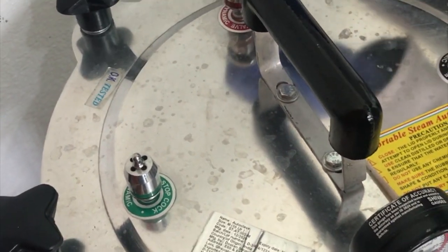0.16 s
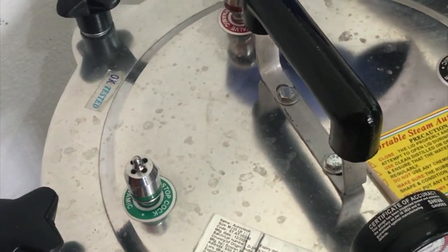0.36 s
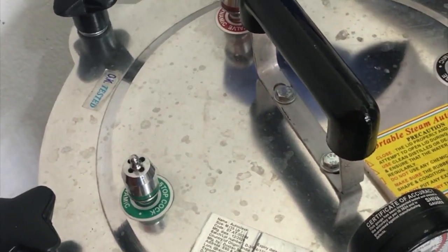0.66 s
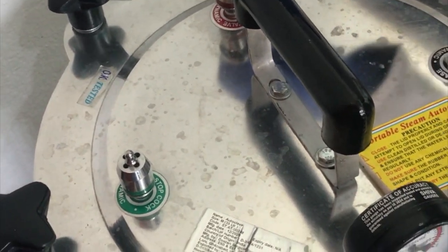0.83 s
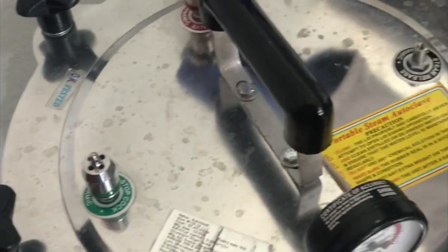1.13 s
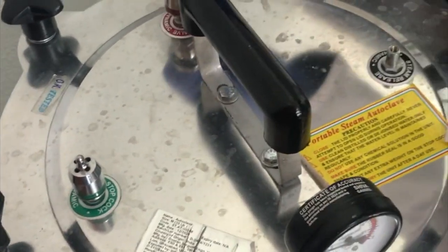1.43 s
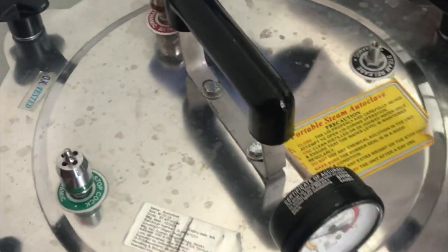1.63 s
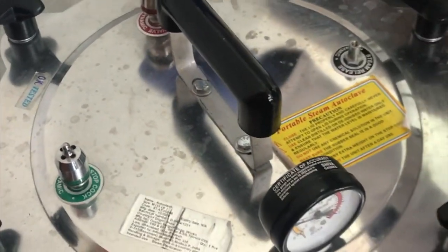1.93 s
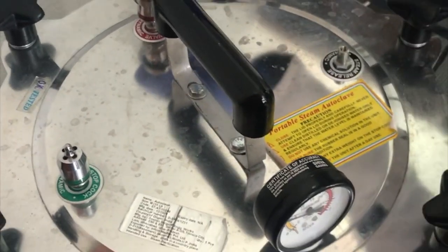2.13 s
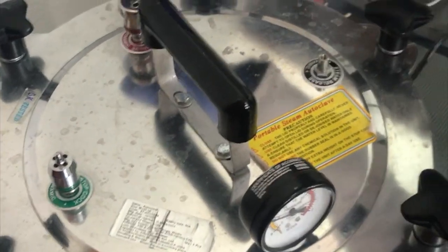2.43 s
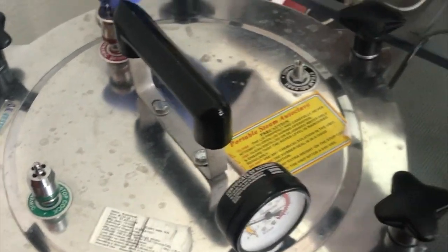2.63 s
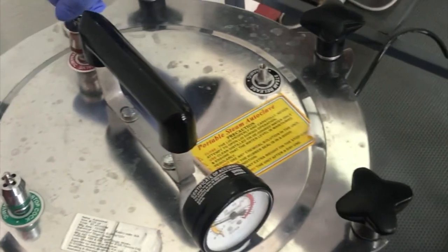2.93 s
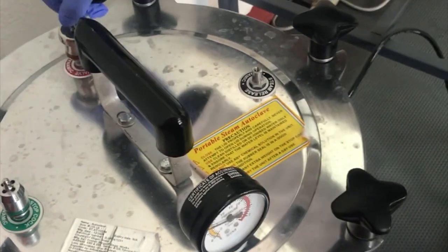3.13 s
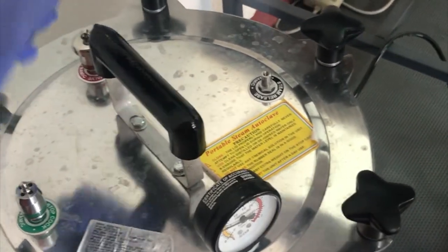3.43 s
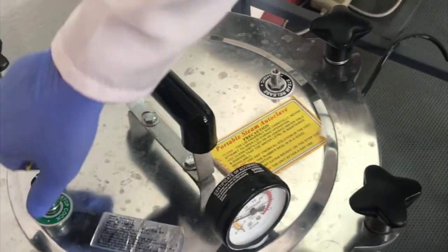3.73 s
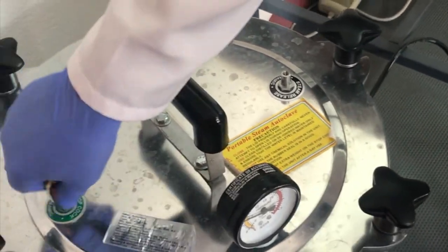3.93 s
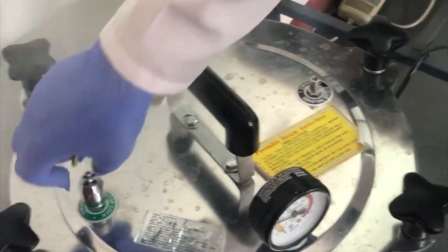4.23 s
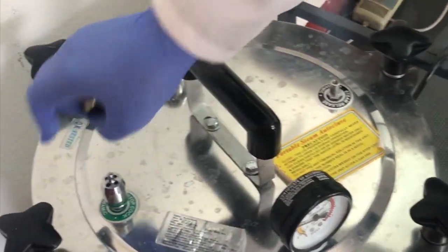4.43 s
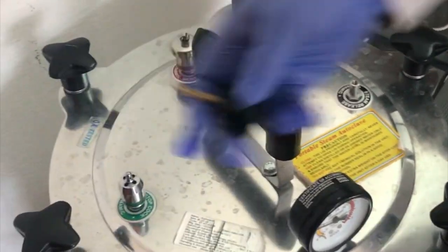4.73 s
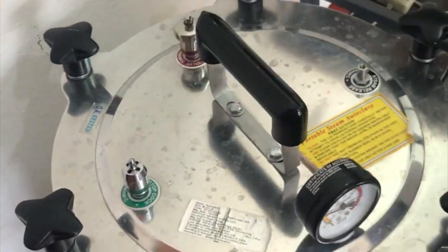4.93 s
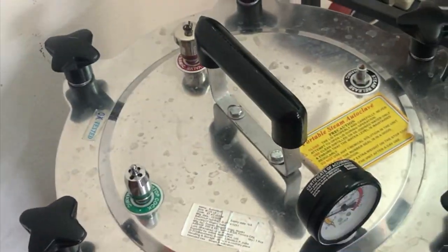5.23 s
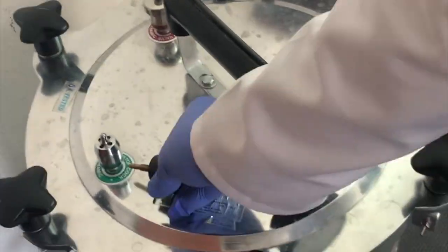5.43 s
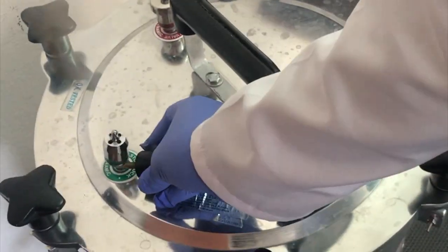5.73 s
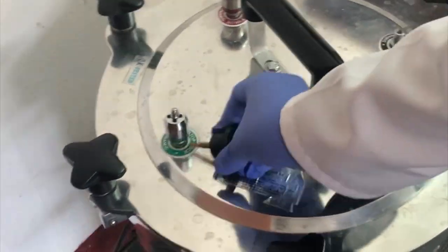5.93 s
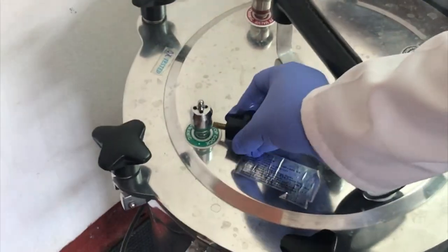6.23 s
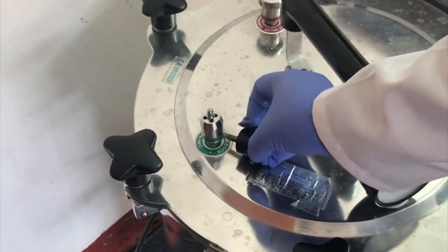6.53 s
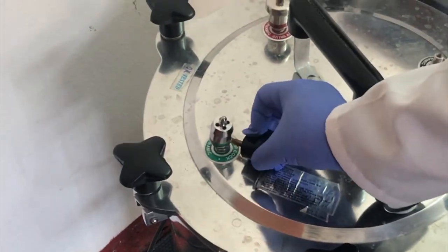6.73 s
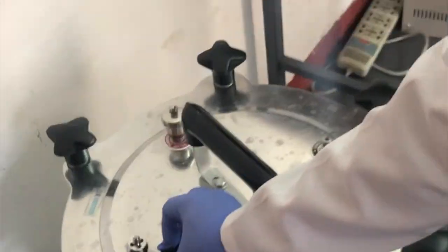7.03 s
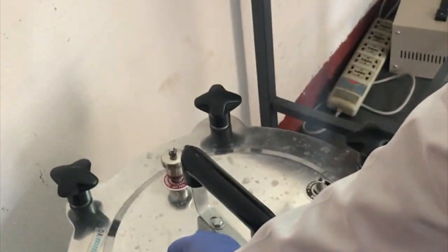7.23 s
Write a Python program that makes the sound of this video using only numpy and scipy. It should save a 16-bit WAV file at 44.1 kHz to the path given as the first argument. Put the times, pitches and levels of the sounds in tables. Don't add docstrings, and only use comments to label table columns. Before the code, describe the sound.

Steam hisses loudly and steadily from a small metal valve up close, with light knocks on the lid, tiny clinks and later sputtering.

```python
import sys
import numpy as np
from scipy import signal
from scipy.fft import rfft, irfft
from scipy.io import wavfile
from scipy.ndimage import uniform_filter1d

SR = 44100
rng = np.random.default_rng(int(sys.argv[2]) if len(sys.argv) > 2 else 0)


def dump_mix(stems):
    frames = np.atleast_2d(stems).T
    limited = np.clip(frames, -1, 1)
    pcm = np.round(limited * 32767).astype(np.int16)
    wavfile.write(sys.argv[1], SR, pcm)


def elevation(decibels):
    levels = np.asarray(decibels, float)
    return 10 ** (levels / 20)


N = 325017

# t/s, level/dB, openness of the path past hand and handle/dB
JET_LEVEL = [(0.0, -16, 2.5), (0.4, -16.5, 5), (1.0, -16, 2.5), (1.35, -16, 3), (1.9, -16, 2.5),
             (2.3, -15.5, 1.5), (3.28, -16, 3), (3.5, -16.5, -2), (3.85, -16, -3), (4.15, -16, 0.5),
             (4.55, -15.5, -6), (5.35, -17, -2.5), (5.8, -17, 1.5), (6.0, -16, -1.5), (6.35, -18, 1),
             (6.6, -16.5, -1), (6.8, -16.5, 1.5), (7.37, -17.5, 1)]
# f/Hz, density/dB
NOZZLE_COLOUR = [(150, -34), (500, -30), (800, -22), (1150, -17), (2000, -12), (3000, -9.5), (4300, -4.5),
                 (6100, 0.5), (7600, -5), (9300, -0.5), (10500, -5), (11500, -0.75), (14000, 0),
                 (15700, -2)]
# f/Hz, share
LOW_SHADE = [(400, 1), (1000, .9), (3200, .7), (4800, 0)]
# f/Hz, share
UPPER_SHADE = [(6300, 0), (7700, .9), (9500, .7), (11500, .1), (15000, -.3)]
UPPER_FOLLOWS = 0.75
JET_TOP_HZ = 15800
SHIMMER_DB, PATCHY_DB = 1.26, 0.5

# from/s, to/s, delay/ms, strength, best reflected f/Hz
STILL_ECHOES = [(-2.3, 9.7, 0.616, 0.04, 10600.0), (-0.87, 1.73, 0.472, 0.22, 4600.0),
                (-0.87, 1.73, 2.146, 0.15, 4600.0), (-0.53, 1.07, 1.042, -0.16, 3300.0),
                (-0.43, 2.17, 1.732, 0.13, 3300.0), (0.0, 1.0, 2.002, -0.12, 8200.0),
                (0.0, 1.0, 2.206, 0.12, 13500.0), (0.0, 1.6, 0.25, -0.13, 13500.0),
                (0.7, 4.9, 0.352, 0.09, 13500.0), (1.4, 5.6, 0.34, -0.07, 6200.0),
                (1.73, 4.33, 1.666, -0.1, 4600.0), (1.87, 3.47, 0.748, 0.2, 1700.0),
                (2.1, 6.3, 0.184, 0.12, 10600.0), (2.1, 6.3, 0.916, 0.09, 4600.0),
                (2.1, 6.3, 1.612, -0.15, 4600.0), (2.3, 2.9, 0.208, 0.15, 10600.0),
                (4.27, 5.87, 1.546, -0.16, 3300.0), (4.77, 7.37, 0.868, -0.07, 10600.0),
                (5.2, 7.8, 0.136, 0.16, 10600.0), (5.2, 7.8, 1.054, -0.13, 13500.0),
                (5.35, 5.65, 0.136, 0.19, 10600.0), (6.0, 7.0, 0.316, 0.43, 4600.0),
                (6.13, 7.73, 1.162, 0.12, 10600.0), (6.9, 7.5, 0.304, 0.32, 3300.0)]
# from/s, to/s, delay at start/ms, delay at end/ms, strength
GLOVE_ECHOES = [(-0.7, 3.5, 0.994, 1.044, -0.19), (0.0, 4.2, 1.234, 1.284, 0.11),
                (1.07, 2.67, 1.27, 1.07, -0.11), (1.4, 2.1, 0.904, 0.764, 0.16),
                (1.67, 2.67, 0.652, 0.452, -0.13), (1.73, 4.33, 1.354, 1.154, -0.1),
                (2.67, 4.27, 0.64, 0.44, -0.16), (3.03, 5.63, 0.682, 0.482, -0.09),
                (3.33, 4.33, 1.354, 1.329, -0.14), (3.5, 7.7, 0.664, 0.574, -0.11),
                (3.68, 4.12, 2.212, 2.122, 0.22), (4.27, 5.87, 0.478, 0.528, 0.27),
                (4.33, 5.33, 1.852, 1.902, 0.18), (5.77, 5.97, 1.132, 1.042, 0.28),
                (5.9, 6.2, 0.49, 0.29, 0.37)]
# from/s, to/s, delay at start/ms, delay at end/ms,
# strength
EDGE_ECHOES = [(-0.7, 3.5, 1.174, 1.374, 0.07), (1.4, 5.6, 0.976, 1.026, 0.06),
               (2.8, 7.0, 0.346, 0.436, -0.06), (2.8, 7.0, 0.796, 0.746, -0.07),
               (3.47, 5.07, 1.312, 1.172, 0.17), (3.73, 4.43, 1.228, 1.178, 0.13),
               (4.5, 5.5, 1.192, 1.242, 0.18), (4.83, 5.83, 0.466, 0.556, 0.1),
               (5.4, 5.85, 1.3, 1.275, -0.16), (5.8, 6.1, 1.228, 1.138, -0.19),
               (6.13, 7.73, 0.274, 0.324, -0.13), (7.0, 7.6, 0.328, 0.188, -0.21),
               (7.05, 7.35, 1.06, 0.97, 0.19),
               (5.85, 6.1, 0.3, 0.23, 0.22)]
# from/s, to/s, delay at start/ms, delay at end/ms, strength
SLEEVE_ECHOES = [(1.33, 2.33, 0.868, 0.893, 0.25), (2.17, 4.77, 1.384, 1.654, 0.12),
                 (3.3, 3.6, 0.844, 0.704, -0.37), (3.47, 6.07, 1.192, 0.992, -0.14),
                 (4.53, 6.13, 0.13, 0.22, -0.27), (6.5, 7.5, 0.574, 0.664, -0.24)]
GLOVE_HZ, EDGE_HZ, SLEEVE_HZ = 5500, 13500, 1700
ECHO_SHARE = 1.01

# blown clear at t/s, depth/dB, closing time/ms
DROPLETS = [(4.945, 12, 2.6), (5.2129, 3, 2.1), (5.4364, 25, 8.4), (5.508, 26, 16), (5.7549, 2, 4.8),
            (5.8063, 14, 8), (5.9341, 11, 2.2), (6.0546, 19, 12), (6.0835, 12, 4.2), (6.2523, 1, 2.9),
            (6.43, 23, 16), (6.4515, 13, 2.6), (6.5983, 12, 4), (6.69, 7.1, 3.8), (7.05, 20, 11),
            (7.2939, 13, 20)]
# t/s, wetness/dB
WETNESS = [(0, -0.05), (4.5, 0.36), (5.4, 1), (7.0, 1), (7.37, .5)]
SURGE_DB, SURGE_HZ = 0.4, 6

# t/s, peak/dB, rattle length/s, brightness/dB
KNOCKS = [(1.117, -41.5, 0.043, 13), (3.294, -26.5, 0.063, 2), (3.334, -33, 0.04, 1), (3.37, -36, 0.048, 1),
          (3.403, -37, 0.03, 0), (3.449, -42, 0.033, 6), (4.023, -41, 0.036, 8), (4.09, -39, 0.03, 4),
          (4.259, -30.5, 0.027, 2.5), (4.297, -34, 0.036, 2), (4.332, -34, 0.04, -5),
          (4.368, -42, 0.03, -8), (5.437, -35, 0.03, -2), (5.559, -39.5, 0.026, 8.5), (5.583, -42, 0.03, 0),
          (5.883, -32, 0.03, -6), (5.922, -38, 0.015, -2), (6.374, -30, 0.017, 2), (6.5, -49, 0.03, 0),
          (6.632, -44, 0.03, 4)]
# f/Hz, level/dB, t60/s
LID_MODES = [(70.4, -17, 0.12), (189.4, -7.5, 0.18), (232, -11, 0.15), (350, -14, 0.024), (482, -6, 0.077),
             (620, -3, 0.05), (772, -6, 0.054), (930, -2, .03), (1155, -1.5, 0.069)]
SCUFF_DB = 5

# f/Hz, level/dB, t60/s
VALVE_MODES = [(1380, 2.5, 0.042), (2380, -1, .035), (1950, -15, 0.57), (2010, -19, 0.49), (2670, -3, .03)]
VALVE_SNAP_S, VALVE_SNAP_DB = 3.293, -20
# t/s, peak/dB
CLINKS = [(4.2757, -43), (5.5972, -44), (5.9395, -31.5), (6.1015, -40), (6.12, -46), (6.3729, -36),
          (6.384, -29.5), (6.5854, -42), (6.6304, -37)]
# f/Hz, level/dB, t60/s
KEY_MODES = [(1123, 3, 0.11), (1173, -5, 0.09)]

# t/s, level/dB
BOIL = [(0, -57), (1.17, -65), (3.0, -64), (3.3, -59.5), (4.6, -59), (5.07, -70.5), (5.75, -74), (6.0, -58),
        (6.9, -72), (7.37, -69)]
HUM_HZ, HUM_WIDTH_HZ = 63.3, 19
BOIL_LUMPY_DB, BOIL_LUMPS_HZ = 1.5, 3
# t/s, gain/dB
HANDLING = [(0, 3), (3.2, -1), (3.43, 8), (3.8, 5.5), (4.27, 14.5), (4.5, 9.5), (5.0, 5), (5.5, 10.5),
            (7.37, 11.5)]
ROOM_DB, ROOM_LUMPY_DB = -64.5, 2

# t/s, lower edge f/Hz
LOOSE_BANDS = [(0.569, 6220), (0.569, 7700), (0.826, 4150), (1.033, 8970), (1.035, 12330), (1.569, 5700),
               (1.614, 4150), (1.615, 5610), (1.615, 8970), (2.31, 13710), (2.541, 13020), (2.589, 6820),
               (2.59, 4230), (2.59, 13020), (2.799, 8890), (3.38, 13710), (3.402, 4230), (3.402, 6220),
               (3.45, 5610), (3.45, 9660), (4.561, 4230), (4.564, 11040), (6.747, 5100)]
LOOSE_DB, LOOSE_S = -48, 0.045
LOOSE_WIDTH, LOOSE_WIDEST_HZ = 0.23, 1700
MIC_LOW_CUT_HZ = 42


def rms_one(x):
    return x / np.sqrt(np.mean(x ** 2) + 1e-20)


def in_time(rows, at_s):
    s, *columns = np.transpose(rows)
    return [np.interp(at_s, s, column) for column in columns]


def at_hz(points, hz):
    point_hz, value = np.transpose(points)
    return np.interp(np.log(hz + 1), np.log(point_hz), value)


def drift(rate_hz):
    r = np.exp(-2 * np.pi * rate_hz / SR)
    settled = signal.lfilter([1], [1, -2 * r, r * r], rng.standard_normal(N + SR))[SR:]
    return rms_one(settled)


def ring(force, hz, t60):
    r = elevation(-60 / (t60 * SR))
    w = 2 * np.pi * hz / SR
    return signal.lfilter([0, np.sin(w)], [1, -2 * r * np.cos(w), r * r], force + 1e-18)


def band(x, low_hz, high_hz):
    return signal.sosfilt(signal.butter(2, [low_hz, high_hz], "band", fs=SR, output="sos"), x)


def jet():
    hz, s, frames = signal.stft(rng.standard_normal(N), SR, nperseg=1024, noverlap=768)
    level_db, open_db = in_time(JET_LEVEL, s)
    hz = hz[:, None]
    colour = elevation(at_hz(NOZZLE_COLOUR, hz)) * (hz < JET_TOP_HZ)
    colour = colour / np.sqrt(np.mean(colour ** 2))
    shade_db = open_db * (at_hz(LOW_SHADE, hz) + UPPER_FOLLOWS * at_hz(UPPER_SHADE, hz))
    gain = colour * elevation(level_db + shade_db + shimmer_db(frames.shape)) * echoes(hz, s)
    hiss = signal.istft(frames * gain, SR, nperseg=1024, noverlap=768)[1][:N]
    wet_db = in_time(WETNESS, np.arange(N) / SR)[0]
    return hiss * chokes(wet_db)


def echoes(hz, s):
    rows = [(start, end, ms, ms, strength, best_hz) for start, end, ms, strength, best_hz in STILL_ECHOES]
    rows += [(*row, GLOVE_HZ) for row in GLOVE_ECHOES]
    rows += [(*row, EDGE_HZ) for row in EDGE_ECHOES]
    rows += [(*row, SLEEVE_HZ) for row in SLEEVE_ECHOES]
    paths = np.ones((len(hz), len(s)), complex)
    for start, end, first_ms, last_ms, strength, best_hz in rows:
        now = (s > start) & (s < end)
        along = (s[now] - start) / (end - start)
        delay_s = (first_ms + (last_ms - first_ms) * along) / 1000
        reflects = np.exp(-0.5 * ((hz - best_hz) / (0.25 * best_hz + 400)) ** 2)
        fade = np.sin(np.pi * along) ** 0.5
        paths[:, now] *= 1 + ECHO_SHARE * strength * reflects * fade * np.exp(-2j * np.pi * hz * delay_s)
    return paths


def shimmer_db(shape):
    white = rng.standard_normal(shape)

    def blur(bins, frames):
        smooth = uniform_filter1d(white, size=bins, axis=0)
        for _ in range(2):
            smooth = uniform_filter1d(smooth, size=frames)
        return rms_one(smooth)

    return SHIMMER_DB * blur(3, 26) + PATCHY_DB * blur(70, 9)


def chokes(wet_db):
    t = np.arange(N) / SR
    wet_db = np.maximum(wet_db, 0)
    tiny = (rng.random(N) < 200 / SR) * rng.exponential(1, N)
    closing = np.exp(-1 / (0.0038 * SR))
    sputter = signal.lfilter([1], [1, -closing], tiny[::-1])[::-1]
    spray = 1.2 * drift(160)
    loss_db = wet_db * (sputter - sputter.mean() + spray)
    loss_db += 0.28 * drift(32)
    loss_db += SURGE_DB * np.sqrt(wet_db) * drift(SURGE_HZ)
    for s, depth_db, closing_ms in DROPLETS:
        closed = np.clip(0.75 + (t - s) * 1000 / closing_ms * 1.06, 0, 1)
        loss_db += depth_db * closed * (t < s)
    return elevation(-uniform_filter1d(loss_db, size=30))


def knocks():
    t, low, high = np.arange(N) / SR, np.zeros(N), np.zeros(N)
    for s, peak_db, length, bright_db in KNOCKS:
        part = slice(int(s * SR), int((s + 6 * length) * SR))
        burst = elevation(peak_db) * np.exp(-(t[part] - s) / length) / np.sqrt(length * SR)
        low[part] += burst
        high[part] += elevation(bright_db) * burst
    lid = np.zeros(N)
    for hz, db, t60 in LID_MODES:
        contacts = (low if hz < 300 else high) * rng.standard_normal(N)
        lid += elevation(db - 2.0) * ring(contacts, hz, t60)
    return lid + elevation(SCUFF_DB) * band(high * rng.standard_normal(N), 250, 1200)


def struck(hits, modes):
    clicks = np.zeros(N)
    for s, peak_db in hits:
        clicks[int(s * SR)] = elevation(peak_db)
    return sum(elevation(db) * ring(clicks, hz, t60) for hz, db, t60 in modes)


def valve():
    return band(struck([(VALVE_SNAP_S, VALVE_SNAP_DB)], VALVE_MODES), 800, 5000)


def key():
    return band(struck(CLINKS, KEY_MODES), 940, 1370)


def rumble():
    t = np.arange(N) / SR
    hum_db = in_time(BOIL, t)[0] + BOIL_LUMPY_DB * drift(BOIL_LUMPS_HZ)
    room_db = ROOM_DB + in_time(HANDLING, t)[0] + ROOM_LUMPY_DB * drift(3.0)
    hum = band(rng.standard_normal(N), HUM_HZ - HUM_WIDTH_HZ / 2, HUM_HZ + HUM_WIDTH_HZ / 2)
    room = band(rng.standard_normal(N), 23, 325)
    return elevation(hum_db) * rms_one(hum) + elevation(room_db - 1.5) * rms_one(room)


def scene():
    return np.tile(jet() + knocks() + valve() + key() + rumble(), (2, 1))


def loose_hiss():
    apart, size = np.zeros(N), int(LOOSE_S * SR)
    hz = np.fft.rfftfreq(size, 1 / SR)
    for s, low_hz in LOOSE_BANDS:
        high_hz = low_hz + min(LOOSE_WIDTH * low_hz, LOOSE_WIDEST_HZ)
        inside = (hz > low_hz - 50) * (hz < high_hz + 100)
        noise = rms_one(irfft(rfft(rng.standard_normal(size)) * inside, size))
        level = elevation(LOOSE_DB) * np.sqrt((high_hz - low_hz) / 10)
        start = int(s * SR) - size // 2
        apart[start:start + size] += level * noise * np.hanning(size)
    return apart


def band_limit(x):
    return signal.sosfilt(signal.butter(12, 17090, fs=SR, output="sos"), x)


def record(dry):
    low_cut = signal.butter(2, MIC_LOW_CUT_HZ, "high", fs=SR, output="sos")
    mix = signal.sosfilt(low_cut, dry) + loose_hiss() * [[1], [-1]]
    return band_limit(mix)


dry = scene()
out = record(dry)
dump_mix(out)
```